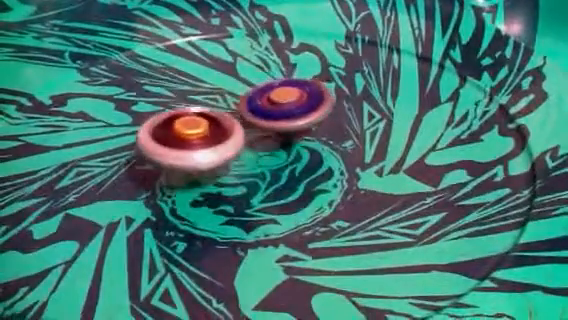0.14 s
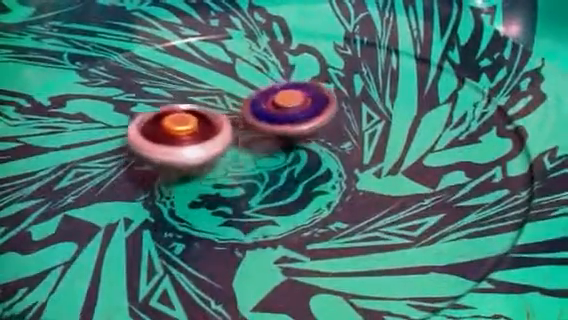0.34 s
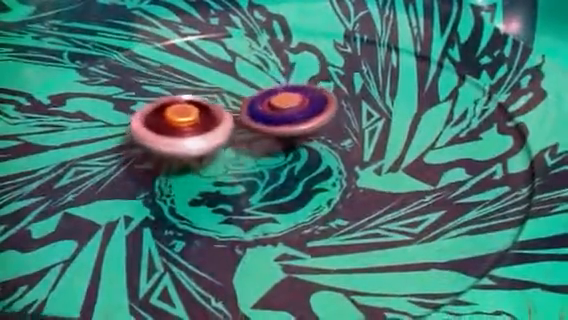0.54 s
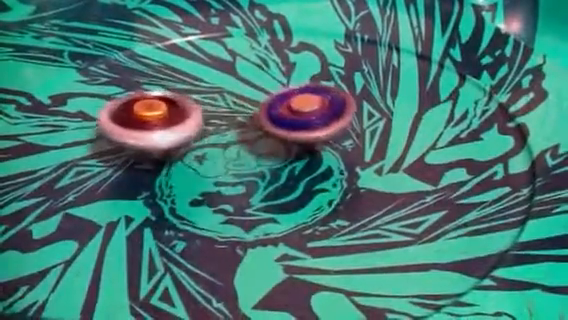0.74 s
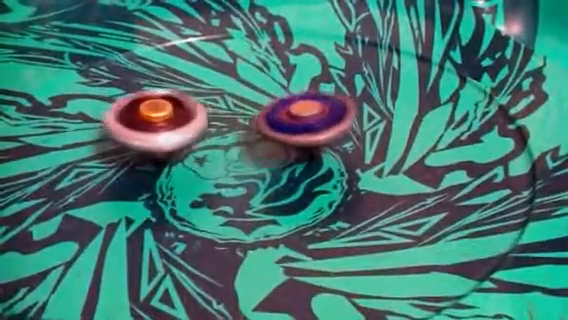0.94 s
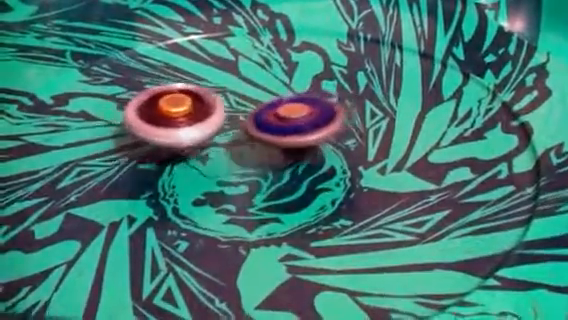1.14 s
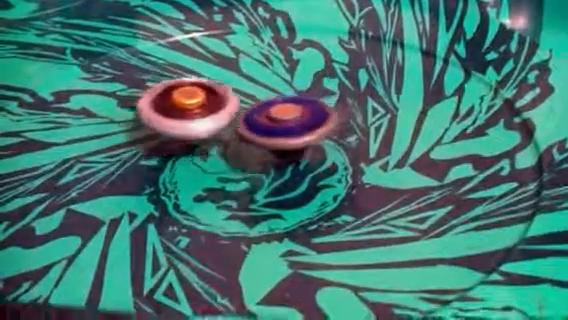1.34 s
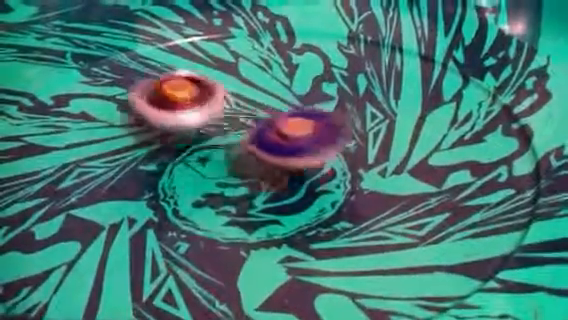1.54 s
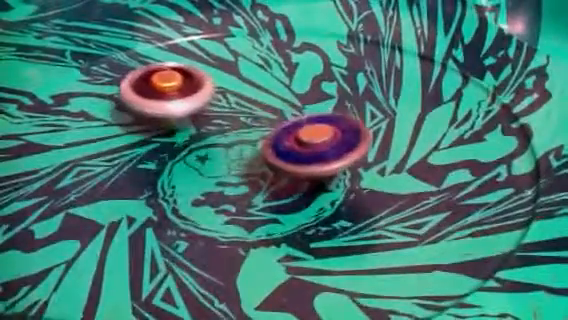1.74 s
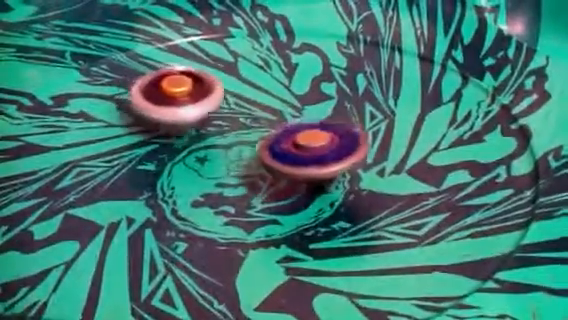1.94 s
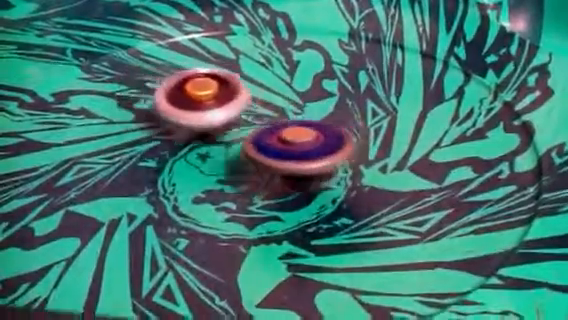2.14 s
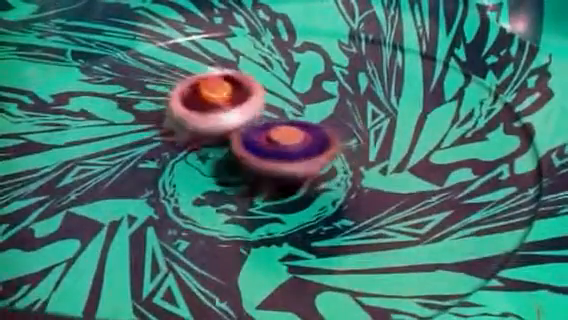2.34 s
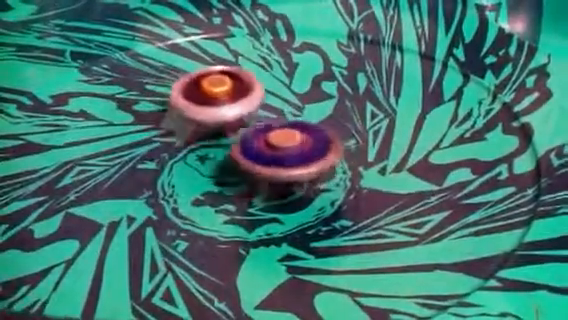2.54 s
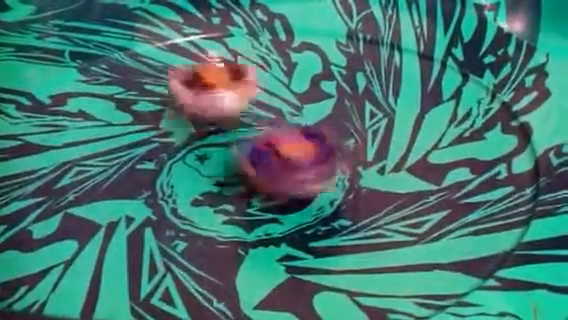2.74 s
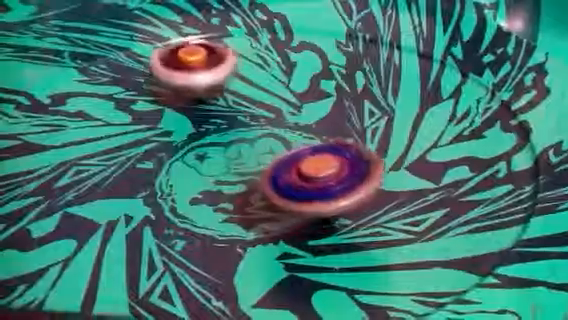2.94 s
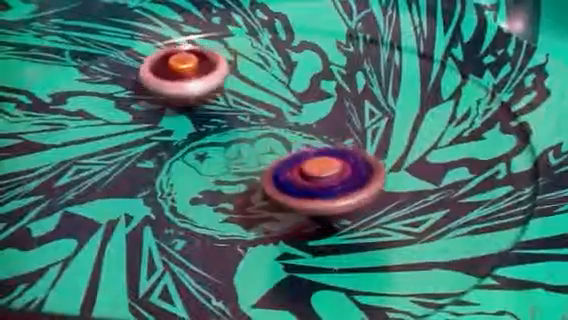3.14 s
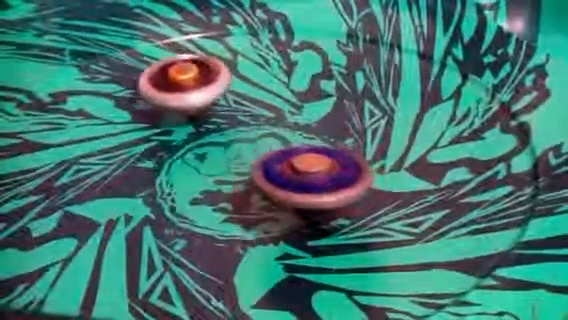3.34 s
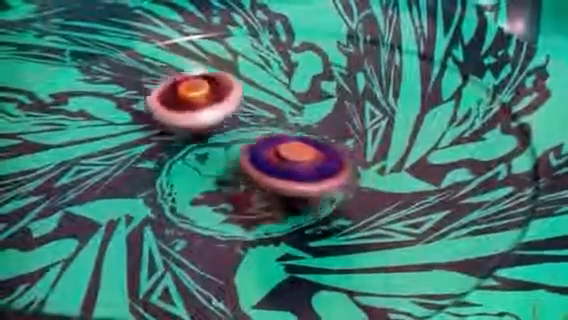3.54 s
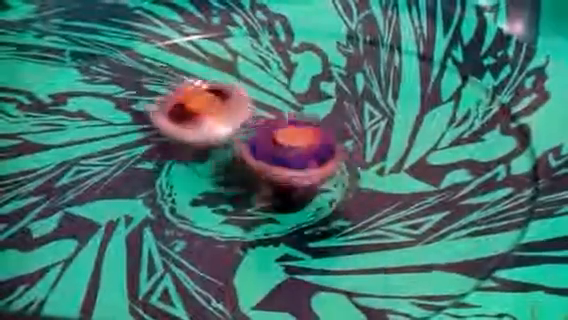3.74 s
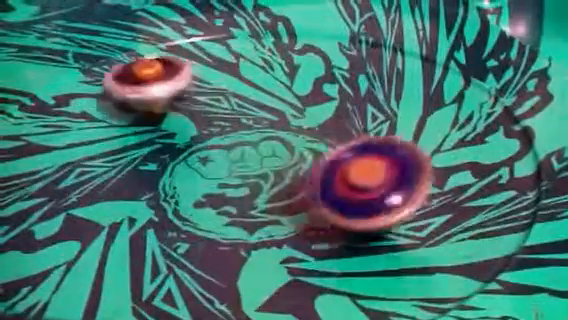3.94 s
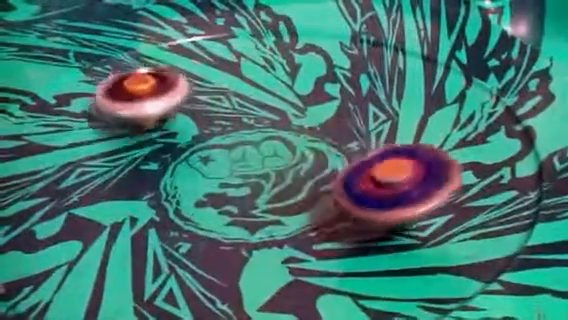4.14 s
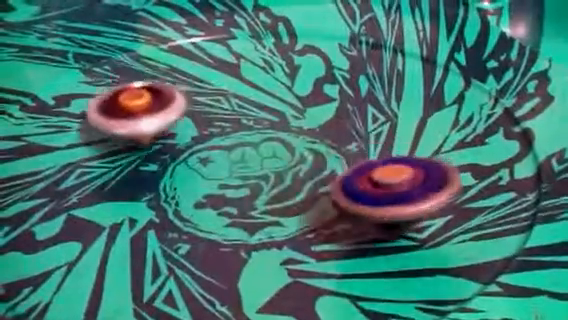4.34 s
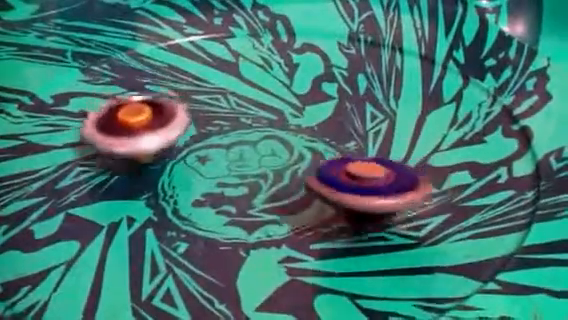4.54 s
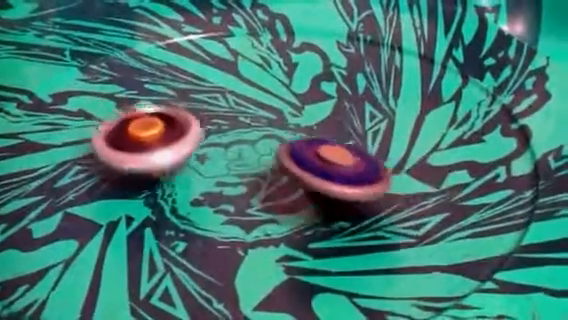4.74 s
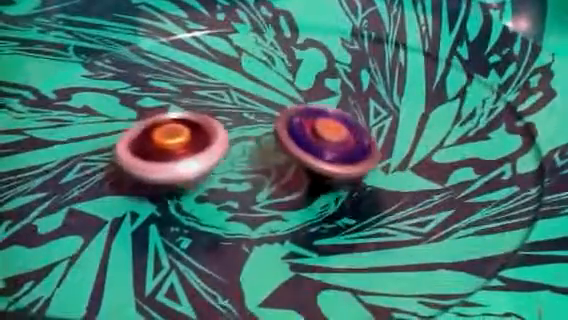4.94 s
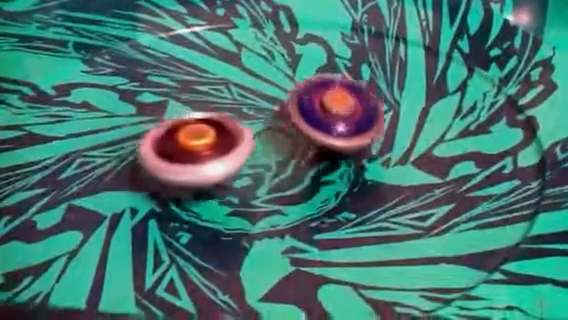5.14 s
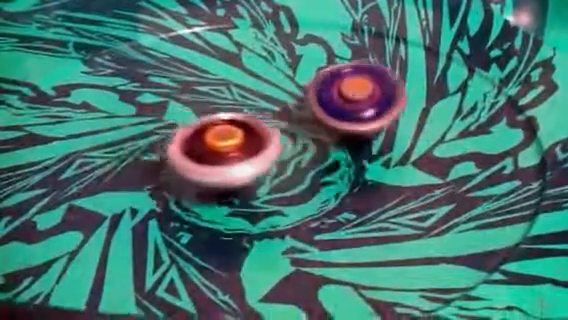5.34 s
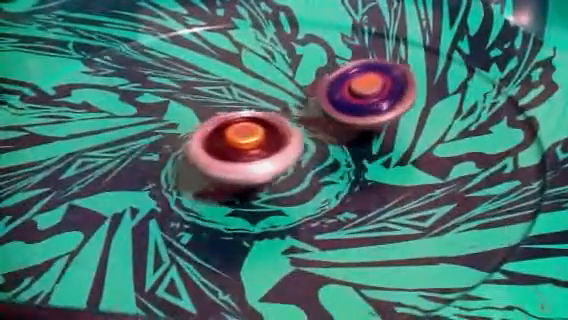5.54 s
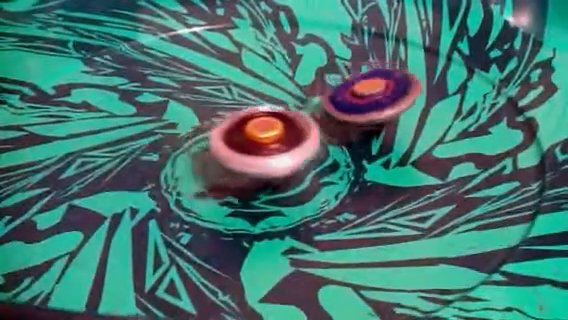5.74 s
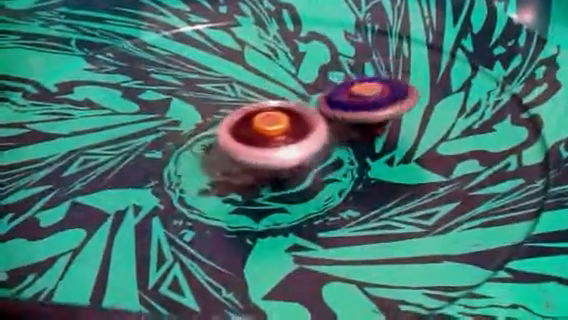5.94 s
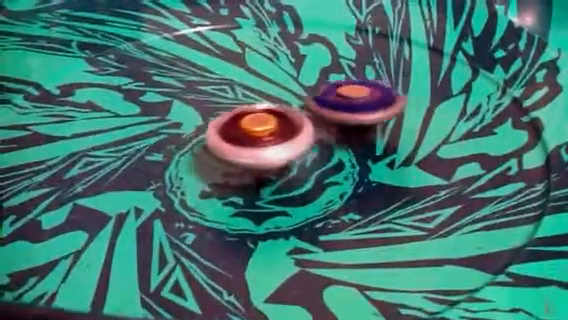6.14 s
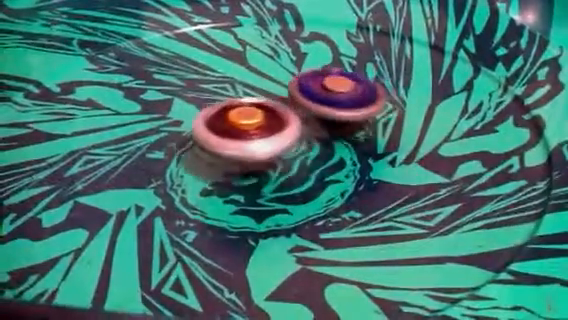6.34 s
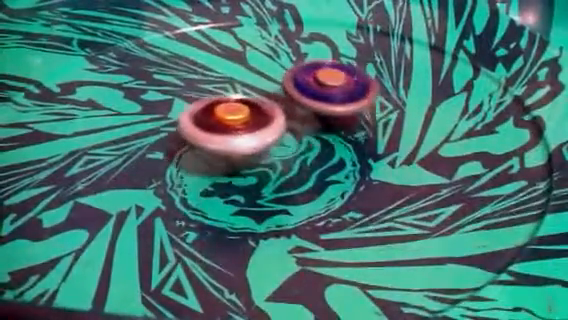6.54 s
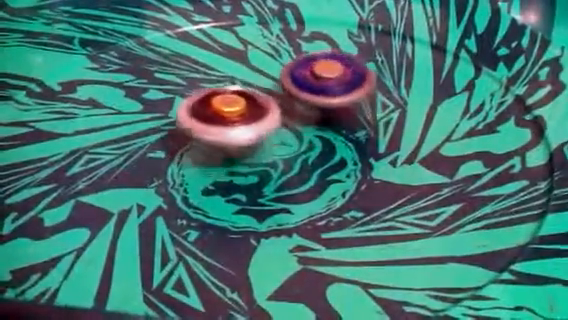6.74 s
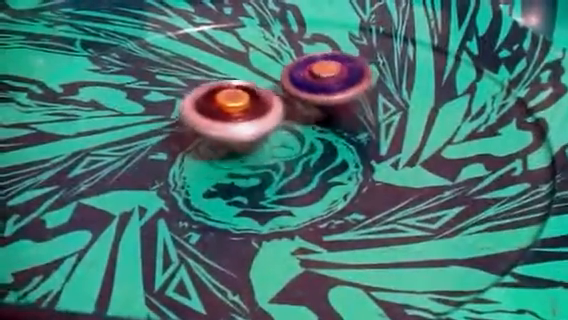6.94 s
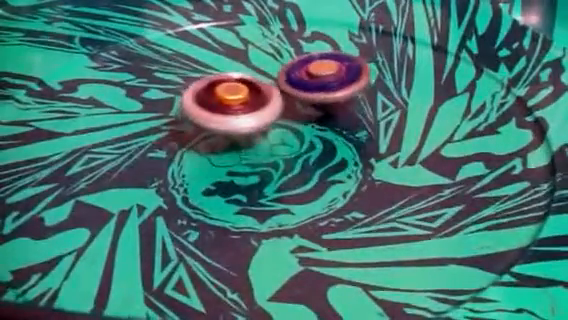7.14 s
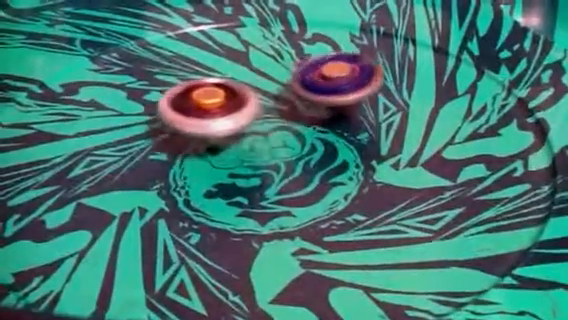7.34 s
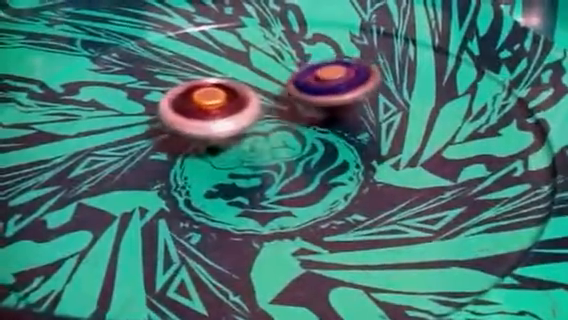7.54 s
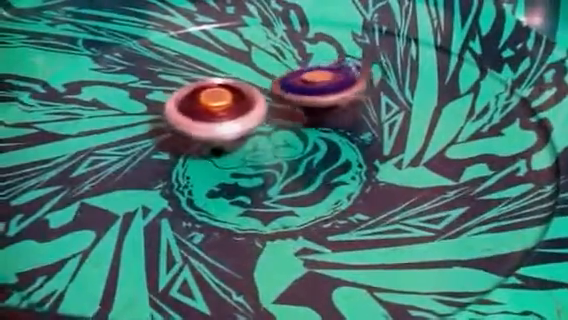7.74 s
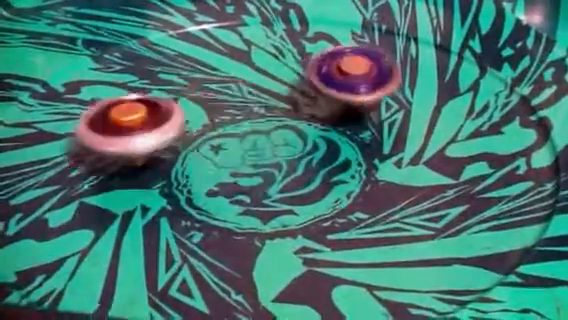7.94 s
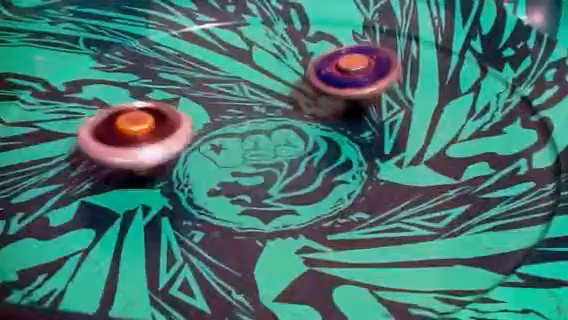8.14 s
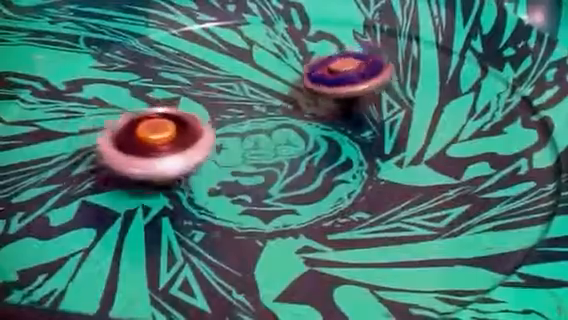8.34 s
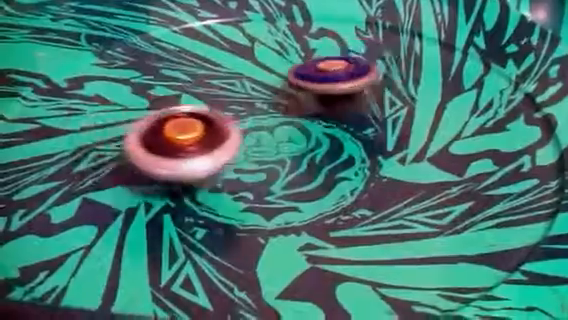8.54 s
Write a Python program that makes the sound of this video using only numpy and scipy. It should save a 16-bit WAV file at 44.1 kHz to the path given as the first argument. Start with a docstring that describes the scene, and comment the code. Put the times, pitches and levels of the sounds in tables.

```python
"""Spinning tops clashing in a dish

Two metal spinning tops circle in a plastic dish, close to the microphone, in a small room.
Each clash is noise bursts for the crack and the dish, plus dying sine waves for the ringing discs.
After some clashes a top hops on its tip; midway a tilted top drones at multiples of its spin.
In between, filtered noise makes the tips rub and sing faintly over a steady sine hum."""
import sys
import numpy as np
from scipy import signal
from scipy.fft import rfft, irfft
from scipy.io import wavfile

SR = 44100
rng = np.random.default_rng(int(sys.argv[2]) if len(sys.argv) > 2 else 0)


def inscribe(sig):
    """Save sig as 16-bit PCM at rate SR to the path in sys.argv[1].

    A 1-D sig is mono; a 2-D sig holds one channel per row.
    Samples are clipped to [-1, 1] before scaling.
    """
    pcm = np.round(np.clip(np.atleast_2d(sig).T, -1, 1) * 32767)
    wavfile.write(sys.argv[1], SR, pcm.astype(np.int16))


N = 377937
TIME = np.arange(N) / SR  # s, the whole scene
T = np.arange(SR // 2) / SR  # s, the half second given to each blow

# One row a clash: t/s, force/dB, push down into the dish/dB, the dish's bright clack against its hollow
# knock/dB, main ring against the force/dB, brightness/dB, overtone that the contact favours f/Hz
CLASHES = [(0.0884, -44, 2.5, -1.5, -1, 0.5, 10900), (0.3019, -34, -0.5, -3, 0, -7, 4710),
           (0.6483, -30, 1, -4.5, 4.5, -6.5, 4580), (1.331, -36, -7, -4.5, 11, 3.5, 13340),
           (1.4357, -36.5, -10.5, 3, 11, -6, 12150), (1.579, -30, 4, 0, 7.5, -7.5, 9150),
           (2.3893, -30.5, 0.5, -1.5, 8.5, -2, 12150), (2.788, -29.5, 1.5, 5.5, 3, -3.5, 13400),
           (3.812, -33, 3, 9, -4, 1.5, 5000), (5.9337, -33.5, 0, 1, -2.5, -1.5, 5330),
           (6.053, -36.5, -2.5, -2.5, 8, -5, 10500), (6.321, -42.5, -1, 5.5, 2, 1, 10500),
           (6.423, -35, 5, 1.5, -4.5, 5, 7400), (7.143, -45.5, -5, 2, -5, 5.5, 10500),
           (7.2526, -34.5, 0, -2, 4.5, 2, 12150), (7.8774, -30.5, 2.5, 7.5, 2.5, -1, 10500)]
# Ringing modes of the two discs: f/Hz, level within its zone/dB, t60/s before ring() scales it
DISC_MODES = [(3990, -9, .035), (4135, -8, .045), (4560, -5, .028), (4700, -6, .028), (4815, -8, .035),
              (4923, -4, .085), (5030, -3, .08), (5350, -7, .025), (5680, -10, .025), (6100, -13, .025),
              (6880, -7, .02), (7300, -3, .035), (7460, -6, .04), (8960, -6, .035), (9130, -4, .03),
              (9270, -6, .04), (9965, -6, .04), (10130, -6, .04), (10550, -9, .025), (10800, -7, .035),
              (10980, -9, .035), (12125, -1, .045), (13150, -10, .025), (13340, -3, .04), (13470, -7, .04),
              (14200, -13, .025)]
# Groups of disc modes: centre f/Hz, level against the force/dB, dB per dB of main ring, dB per dB of
# brightness. A contact that spares the main ring strikes the damped clank just above it instead.
ZONES = [(4054, 0, 1, 0), (4740, 1.5, -1.05, 0.5), (5058, -2, 0.57, 0.96), (7400, -9, 0, 2),
         (9150, -8, 0.41, 1.9), (10500, -2.5, 0, 1.5), (12230, -6, 0, 0.5), (13400, -3.5, 0.06, 0.4)]
# Colour of the dish's low boom: f/Hz, level per Hz/dB
THUMP_COLOUR = [(25, -21), (60, -28), (90, -11), (125, -0.5), (175, 0), (250, -1), (320, -7), (600, -36.5),
                (2000, -69.5)]
# Colour of the dish's hollow knock: f/Hz, level per Hz/dB
KNOCK_COLOUR = [(120, -32.5), (290, -9), (370, 0.5), (475, 0.5), (530, -6.5), (595, 2), (680, -0.5),
                (780, 4), (920, -5.5), (1400, -24.5), (5000, -62)]
# Colour of the dish's bright clack: f/Hz, level per Hz/dB
CLACK_COLOUR = [(300, -33.5), (800, -11.5), (1000, -3), (1100, -4.5), (1230, 5.5), (1500, -5), (2000, -7.5),
                (3300, -20), (9000, -47)]
# Colour of metal cracking on metal: f/Hz, level per Hz/dB
CRACK_COLOUR = [(500, -36), (1800, -11.5), (2300, -7.5), (2750, 0.5), (3200, -2.5), (3700, 0.5),
                (5500, 0.5), (6500, -5.5), (8200, -9.5), (10500, -6.5), (12700, -7.5), (15000, -7.5)]
# Colour of the dish when a tip lands on it: f/Hz, level per Hz/dB
HOP_COLOUR = [(40, -28.5), (130, 9.5), (300, -1.5), (600, 2), (900, -2.5), (1300, 1), (2200, -13.5),
              (4500, -23.5), (15000, -44)]
# Colour of the landing tip itself: f/Hz, level per Hz/dB
TICK_COLOUR = [(500, -28.5), (2500, -1.5), (4500, 2.5), (6700, 0.5), (9000, -3), (15000, -7.5)]
# How long the room rings: f/Hz, t60/s
ROOM = [(60, .4), (150, .34), (400, .25), (1200, .22), (4000, .17), (9000, .145), (15000, .12)]
# The tops slow down: t/s, spin/turns per s
SPIN = [(0, 46), (2, 44), (3.8, 41.5), (4.1, 40.5), (4.8, 40.2), (8.57, 36)]
# A knocked top hops once a turn; after the landings the rubbing is quieter for a while: first landing t/s,
# landings, relative knock on the dish/dB, relative tick of the tip/dB, drop of the rubbing afterwards/dB
SKITTERS = [(1.6, 2, -24.5, -32, 2), (2.434, 3, -34.5, -44, 0.5), (2.866, 3, -38, -49, 3.5),
            (3.839, 2, -31, -39, -0.5), (3.889, 5, -28, -42.5, 4.5), (7.962, 2, -38, -51, 3.5)]
# How hard the tips grind on the dish: t/s, relative level/dB
GRIND = [(0.0, -66.5), (1.1, -67.5), (1.48, -64), (1.69, -68.5), (1.91, -65), (2.34, -63.5), (3.2, -66),
         (3.82, -59.5), (3.94, -65), (4.89, -64.5), (6.32, -63), (6.54, -68), (6.85, -66), (7.11, -64),
         (7.54, -66), (7.85, -61.5), (7.99, -68.5), (8.57, -66.5)]
# Colour of the rubbing: f/Hz, relative level/dB
RUB_COLOUR = [(18, -61.5), (35, -44), (62, -22.5), (90, -16), (115, -3.5), (160, -10), (225, -3.5),
              (290, -13), (450, -8.5), (580, -15), (800, -12), (1250, -15), (2000, -18.5), (4500, -22.5),
              (8000, -25), (15000, -27)]
# Resonances that the tips excite for a while: start t/s, end t/s, centre f/Hz, width/Hz, relative level/dB
SINGING = [(-.3, 2.9, 6280, 450, -78), (2.7, 6.5, 6180, 800, -81), (6.5, 8, 1270, 200, -74),
           (6.3, 8, 2820, 240, -79), (1.7, 2.8, 3780, 250, -81), (4.1, 5.9, 2780, 450, -82)]
# How strongly a tilted top shakes the dish: t/s, relative level/dB
WOBBLE = [(0, -86), (3.8, -79), (4.05, -74.5), (4.35, -69), (4.8, -78.5), (5.6, -81), (6.2, -90),
          (8.57, -94.5)]
# Tones of that shaking: multiple of the spin, relative level/dB
WOBBLE_ORDERS = [(2, -14.5), (3, 1.5), (4, 0.5), (5, -12), (6, -6), (7, -10), (8, -5.5), (11, -9.5),
                 (12, -10.5)]

HUM_HZ, HUM_DB = 359.2, -71
HISS_DB, HISS_FOLLOWS, USUAL_GRIND_DB = -68, 0.44, -65.5  # hiss at the usual grind, its dB per dB of grind
EASE_S = 0.55  # time constant with which the rubbing returns to its level after the landings
HOP_LOSS_DB, TICK_LOSS_DB = 4, 2.5  # each landing is weaker than the last
BLOW_S = 0.04  # s, reference length for the energy of a blow
MAIN_HZ, MAIN_DB = 4056, -1.45  # the longest ring, level against its zone
LINGER_DB, LINGER_T60_S = -24.5, 0.26  # its faint twin, level against the main ring
# Fast tops spring apart and ring on; slow ones stay in touch and damp each other.
# t60 of the main ring at RING_SPIN turns per s, and how steeply it follows the spin:
RING_T60_S, RING_SPIN, RING_POWER = 0.099, 41.55, 3.1
RING_DAMPING = 0.02  # about the share of that t60 lost for each dB of push
FAVOUR_DB, FAVOUR_WIDTH_HZ = 7, 600  # lift of overtones with a crest at the point of contact
KNOCK_DB, CLACK_DB = -10, -9  # the dish's answer against force plus push
THUMP_DB, THUMP_PER_FORCE, THUMP_PER_PUSH = -35.5, 0.4, 0.65  # the low boom depends mostly on the push
EXTRA_BOOM_S, EXTRA_BOOM_DB = 3.812, -37.5  # an extra low boom of the dish at one clash
EDGE_HZ = 15300  # upper edge of the recorder's band


def amp(db):
    """Turns decibels into a gain."""
    return 10 ** (np.asarray(db) / 20)


def evened(x):
    """Scales a sound to rms 1."""
    return x / np.sqrt(np.mean(x ** 2) + 1e-30)


def blow(x):
    """Scales a blow to the energy of rms 1 held for BLOW_S."""
    return x * np.sqrt(BLOW_S * SR / np.sum(x ** 2))


def read(points, hz):
    """Reads a spectrum on a log-frequency axis."""
    f, value = np.transpose(points)
    return np.interp(np.log(hz + 1), np.log(f), value)


def curve(points):
    """Reads a curve over time at every sample."""
    return np.interp(TIME, *np.transpose(points))


def spin_at(s):
    """Turns per second at time s."""
    return np.interp(s, *np.transpose(SPIN))


def turns_so_far():
    """Adds up the spin into a running count of turns."""
    return np.cumsum(curve(SPIN)) / SR


def add(mix, s, sound):
    """Mixes a sound in at time s, cutting what runs past the end."""
    part = mix[round(s * SR):][:len(sound)]
    part += sound[:len(part)]


def colour(x, points):
    """Filters with the given spectrum, in a way that never sounds ahead of the blow (minimum phase)."""
    log_gain = np.log(amp(read(points, abs(np.fft.fftfreq(4096, 1 / SR)))))
    taps = np.fft.ifft(np.exp(np.conj(signal.hilbert(log_gain)))).real
    return signal.fftconvolve(x, taps[:len(taps) // 2])[:len(x)]


def drift(slow_hz, fast_hz):
    """Slow random wandering of rms 1, from 20 sine waves that weaken with frequency."""
    t = np.linspace(0, TIME[-1], N // 100)
    wander = np.zeros(len(t))
    for f in np.geomspace(slow_hz, fast_hz, 20):
        wander += np.sin(2 * np.pi * (f * t + rng.random())) / np.sqrt(f)
    return np.interp(TIME, t, evened(wander))


def dying(t60):
    """An envelope that falls 60 dB in t60 seconds."""
    return np.exp(-np.log(1000) * T / t60)


def burst(t60, rise_s=0.00015):
    """A dense cloud of quickly dying vibrations, made of noise."""
    rise = 1 - np.exp(-T / rise_s)
    return blow(rng.standard_normal(len(T)) * rise * dying(t60))


def in_room(x, wet_db, gap_s=0.0085):
    """Adds the room's tail of dying noise; the tops move, so the echoes differ for every blow."""
    hz, t, noise = signal.stft(rng.standard_normal(len(T)), SR, nperseg=256)
    fading = noise * np.exp(-np.log(1000) * t / read(ROOM, hz)[:, None])
    tail = signal.istft(fading, SR, nperseg=256)[1][:len(T)]
    tail *= np.minimum(T / gap_s, 1) ** 2  # the tail swells in after the direct sound
    echo = signal.fftconvolve(x, tail)[:len(T)]
    return blow(blow(x) + amp(wet_db) * blow(echo))


def hum():
    """A steady, barely wavering sine hum in the room."""
    waver = 1 + 0.08 * drift(0.3, 4)
    return np.sqrt(2) * amp(HUM_DB) * waver * np.sin(2 * np.pi * HUM_HZ * TIME)


def singing(level_db=-0.5, fade_s=0.52):
    """Friction at the tips fitfully wakes single resonances: narrow bands of flickering noise."""
    hz = np.fft.rfftfreq(N, 1 / SR)
    out = np.zeros(N)
    for start, end, centre, width, db in SINGING:
        resonance = 1 / (1 + ((hz - centre) / (width / 2)) ** 2)
        band = irfft(rfft(rng.standard_normal(N)) * resonance, N)
        fade = np.clip(np.minimum(TIME - start, end - TIME) / fade_s, 0, 1)
        flicker_db = 2.2 * drift(6, 50)
        out += amp(db + level_db + flicker_db) * evened(band) * fade
    return out


def easing():
    """The dB by which the rubbing is quieter after the landings, slowly returning to its level."""
    drop_db = np.zeros(N)
    for s, landings, _, _, ease_db in SKITTERS:
        since = TIME - s - round(landings) / spin_at(s)
        drop_db += ease_db * (since > 0) * np.exp(-abs(since) / EASE_S)
    return drop_db


def rubbing(split_hz=2200, flutter=0.15, rumble_db=-1.5):
    """The tips grind on the dish: a low rumble that flutters once a turn, and a hiss that follows less."""
    hz = np.fft.rfftfreq(N, 1 / SR)
    noise = rfft(rng.standard_normal(N)) * amp(read(RUB_COLOUR, hz))
    low = 1 / (1 + (hz / split_hz) ** 4)
    turn = 1 + flutter * np.cos(2 * np.pi * turns_so_far())
    uneven_db = 0.55 * drift(6, 40)
    grind_db = curve(GRIND)
    rumble = evened(irfft(noise * low, N)) * amp(grind_db + rumble_db + uneven_db) * turn
    hiss_db = HISS_DB + HISS_FOLLOWS * (grind_db - USUAL_GRIND_DB)
    hiss = evened(irfft(noise * (1 - low), N)) * amp(hiss_db)
    return (rumble + hiss) * amp(-easing())


def wobble():
    """A tilted top shakes the dish, making sine tones at multiples of its spin."""
    turns = turns_so_far()
    drone = np.zeros(N)
    for order, db in WOBBLE_ORDERS:
        drone += amp(db) * np.sin(2 * np.pi * (round(order) * turns + rng.random()))
    return np.sqrt(2) * amp(curve(WOBBLE)) * drone


def landing(rebound_db=-5):
    """A tip touches down and rebounds once, a few milliseconds later."""
    touch = burst(t60=0.052, rise_s=0.0012)
    rebound = burst(t60=0.035, rise_s=0.0008)
    add(touch, rng.uniform(0.0028, 0.008), amp(rebound_db) * rebound)
    return touch


def hops():
    """The tip lands and scuffs the plastic once a turn, ever more softly."""
    out = np.zeros(N)
    for s, landings, knock_db, tick_db, _ in SKITTERS:
        for k in range(round(landings)):
            knock_gain = amp(knock_db - 15.5 - k * HOP_LOSS_DB)
            tick_gain = amp(tick_db - 11 - k * TICK_LOSS_DB)
            knock = knock_gain * in_room(colour(landing(), HOP_COLOUR), wet_db=-15)
            tick = tick_gain * in_room(colour(landing(), TICK_COLOUR), wet_db=-13)
            add(out, s + k / spin_at(s), knock + tick)
    return out


def thump(db):
    """The floor of the dish flexes and booms: a burst of low noise."""
    return amp(db) * in_room(colour(burst(t60=0.11), THUMP_COLOUR), wet_db=-5)


def struck(force_db, ring_db, bright_db, favoured_hz):
    """How hard one contact strikes each group of disc modes, in dB."""
    hz, db, per_ring, per_bright = np.transpose(ZONES)
    favour = np.exp(-((hz - favoured_hz) / FAVOUR_WIDTH_HZ) ** 2)
    return force_db + db + per_ring * ring_db + per_bright * bright_db + FAVOUR_DB * favour


def disc_mode(hz, t60, spin, swirl, detune, rise_s):
    """One dying sine wave of a disc; its lobes sweep past the microphone twice a turn."""
    phase, facing = rng.uniform(0, 2 * np.pi, 2)
    sweep = 1 + swirl * np.cos(2 * np.pi * 2 * spin * T + facing)
    onset = 1 - np.exp(-T / rise_s)
    pitch_hz = hz * (1 + detune * rng.standard_normal())
    return blow(np.sin(2 * np.pi * pitch_hz * T + phase) * sweep * onset * dying(t60))


def ring(zone_db, main_t60, spin, detune=0.003, sustain=0.92):
    """The discs' modes, each as strong as its zone is struck, with their echo in the room."""
    main = disc_mode(MAIN_HZ, main_t60, spin, swirl=0.33, detune=0.00049, rise_s=0.00056)
    # the main mode's twin is barely damped and lingers faintly
    twin = disc_mode(MAIN_HZ, LINGER_T60_S, spin, swirl=0.4, detune=0.0005, rise_s=0.001)
    main += amp(LINGER_DB) * twin
    modes = np.zeros(len(T))
    for hz, db, t60 in DISC_MODES:
        zone = np.argmin(abs(np.array(ZONES)[:, 0] - hz))
        scatter = detune * BLOW_S / t60  # the damped modes vary most with the contact
        mode = disc_mode(hz, t60 * sustain, spin, swirl=0.5, detune=scatter, rise_s=0.00062)
        modes += amp(zone_db[zone] + db) * mode
    size = np.sqrt(np.sum(modes ** 2) / (BLOW_S * SR))  # in_room() evens the level, so put it back
    clank = size * in_room(modes, wet_db=-19)
    return clank + amp(zone_db[0] + MAIN_DB) * in_room(main, wet_db=-23.5)


def clashes():
    """Metal meets metal: a snap, a short chatter of loose parts, the ring, and the jolt into the dish."""
    out = np.zeros(N)
    for s, force_db, push_db, tone_db, ring_db, bright_db, favoured_hz in CLASHES:
        snap = burst(t60=0.006) + amp(-1.5) * burst(t60=0.03)
        crack = amp(force_db + 8) * in_room(colour(snap, CRACK_COLOUR), wet_db=-15.5)

        # the jolt goes through the tips into the dish
        jolt_db = force_db + push_db
        slap = burst(t60=0.022) + amp(2) * burst(t60=0.043)
        clack = amp(jolt_db + CLACK_DB + tone_db / 2) * in_room(colour(slap, CLACK_COLOUR), wet_db=-13)
        hollow = colour(burst(t60=0.06), KNOCK_COLOUR)
        knock = amp(jolt_db + KNOCK_DB - tone_db / 2) * in_room(hollow, wet_db=-7.5)
        boom = thump(THUMP_DB + THUMP_PER_FORCE * force_db + THUMP_PER_PUSH * push_db)

        spin = spin_at(s)
        main_t60 = RING_T60_S * (spin / RING_SPIN) ** RING_POWER * np.exp(-RING_DAMPING * push_db)
        metal = ring(struck(force_db, ring_db, bright_db, favoured_hz), main_t60, spin)
        add(out, s, crack + clack + knock + boom + metal)
    add(out, EXTRA_BOOM_S, thump(EXTRA_BOOM_DB))
    return out


def scene():
    """All sources add up at one microphone."""
    background = hum() + singing() + rubbing() + wobble()
    return (background + hops() + clashes())[None]


def record(dry, ceiling=0.95):
    """The recorder rounds the tallest peaks, then cuts everything above its band."""
    rounded = ceiling * np.tanh(dry / ceiling)
    low_pass = signal.firwin(511, EDGE_HZ, window=("kaiser", 9), fs=SR)
    return signal.oaconvolve(rounded, low_pass[None], "same")


dry = scene()
out = record(dry)
inscribe(out)
```